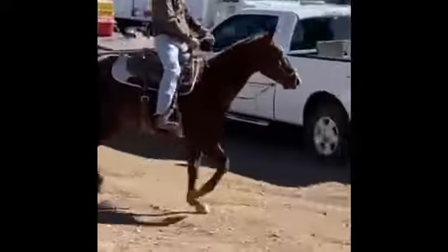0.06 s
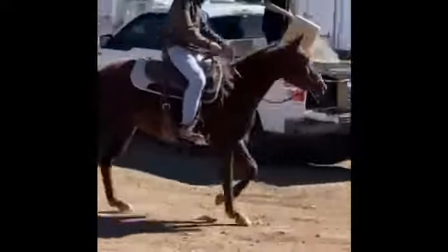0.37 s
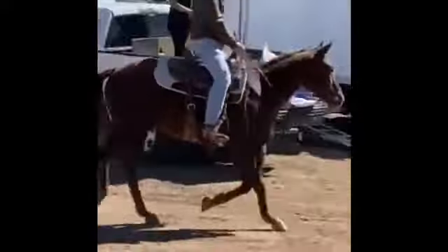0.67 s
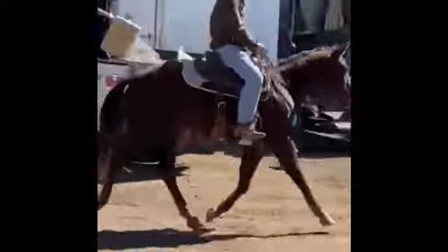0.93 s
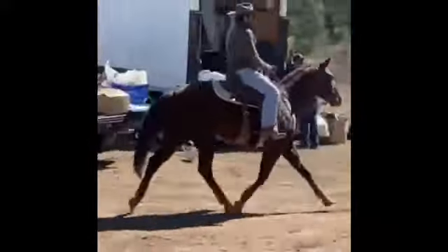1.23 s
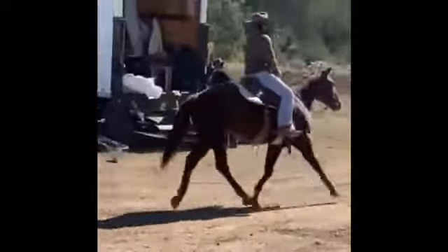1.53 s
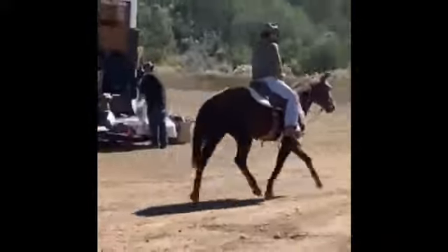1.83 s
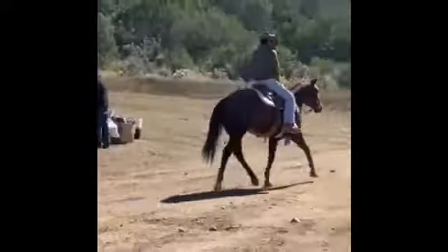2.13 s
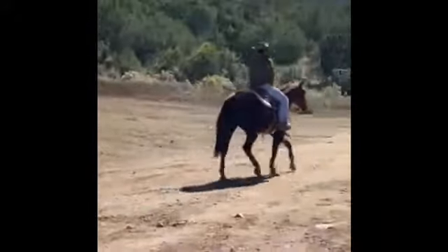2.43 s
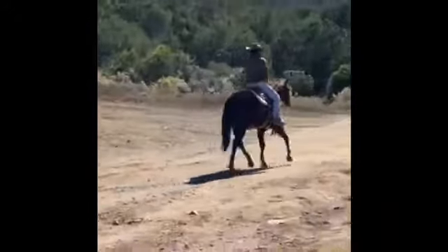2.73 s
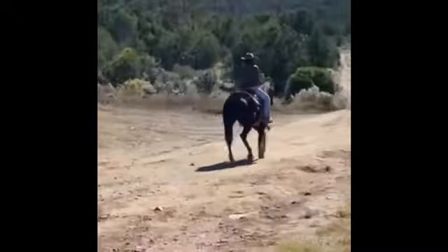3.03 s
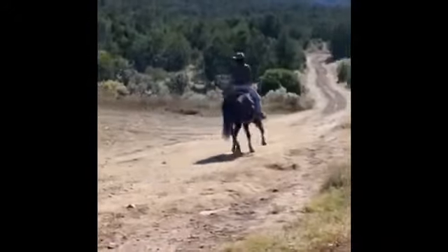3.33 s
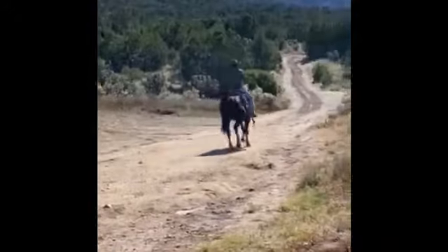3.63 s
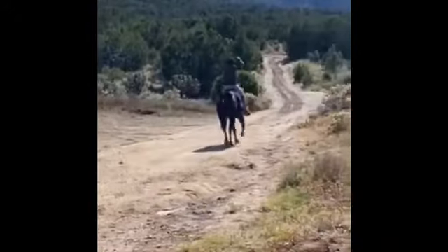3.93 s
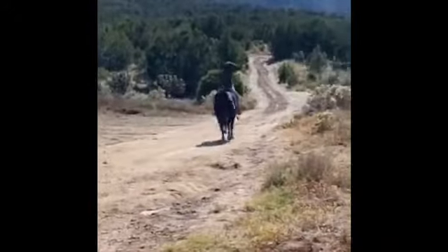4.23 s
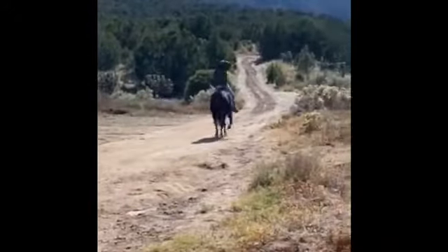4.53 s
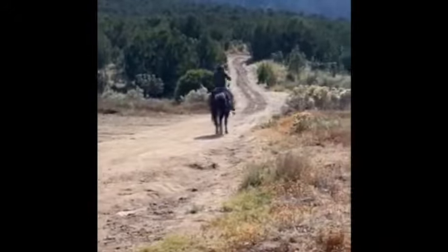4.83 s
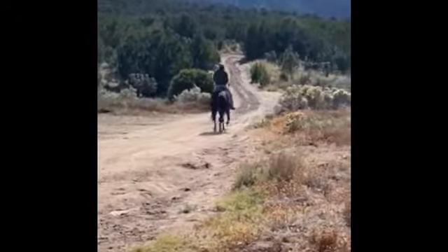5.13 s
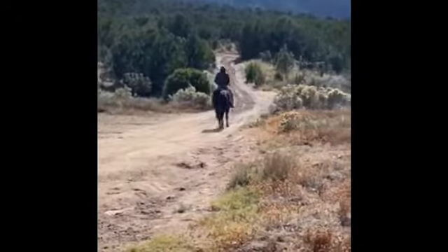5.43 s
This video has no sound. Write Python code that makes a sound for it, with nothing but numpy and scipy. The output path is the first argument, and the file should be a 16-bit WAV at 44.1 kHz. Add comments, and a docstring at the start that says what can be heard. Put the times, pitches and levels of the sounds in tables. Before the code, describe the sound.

A horse trots past on a gritty dirt road and moves off, with hollow hoof knocks and clinking tack over a low generator hum.

```python
"""A ridden horse trots past on a hard, gritty dirt road and moves off, about three footfalls a second.
Each hoof lands with a hollow knock inside a scuff of crushed earth and sand. Kicked pebbles click, the
metal tack clinks and rings, and the saddle creaks. Underneath, a nearby generator hums over a soft wash
of air. Near the end a little wind buffets the microphone, the hum wavers, and a fine treble hiss dips
and swells."""
import sys
import numpy as np
from scipy import signal
from scipy.fft import rfft, irfft
from scipy.io import wavfile

SR = 44100
rng = np.random.default_rng(int(sys.argv[2]) if len(sys.argv) > 2 else 0)


def file_out(sig):
    """Save sig as 16-bit WAV at sys.argv[1]."""
    # one column per channel
    cols = np.atleast_2d(sig).T
    # limit, then scale
    lim = np.clip(cols, -1, 1)
    pcm = np.round(lim * 32767).astype(np.int16)
    wavfile.write(sys.argv[1], SR, pcm)


N = 250929
TIME = np.arange(N) / SR

# hoof hits: (time [s], knock level [dB], hollow pitch [Hz], ring length [cycles], crack level [dB])
HOOF_HITS = [(.2825, -33, 805, 5, -44), (.3212, -28, 910, 12, -34), (.6445, -37, 627, 4.3, -37),
             (0.7505, -28, 517, 13, -70), (.7706, -34.5, 530, 8, -65), (0.9832, -44, 477, 2.2, -36),
             (0.995, -35, 1010, 4, -31), (1.0053, -30.5, 1220, 5.3, -24.5), (1.071, -39, 770, 7, -41),
             (1.2407, -42, 790, 4, -20.5), (1.2813, -34, 980, 7.9, -27), (1.2962, -33, 1000, 10, -40),
             (1.554, -39.5, 800, 5.2, -33), (1.619, -46, 960, 4, -45), (1.6375, -37, 910, 5.4, -27),
             (1.9045, -57, 1000, 4, -25.5), (1.9503, -33, 1120, 5.3, -27), (1.9535, -29, 1260, 6.5, -44),
             (2.171, -37, 1080, 2.3, -32), (2.2659, -29, 870, 4.9, -34), (2.5665, -32.5, 840, 4.9, -35),
             (2.9452, -25, 780, 3.5, -17.5), (3.204, -34.5, 560, 3.9, -43), (3.2105, -36.5, 755, 4.7, -47),
             (3.5485, -41, 1100, 5.2, -32), (3.659, -39, 507, 7, -65), (3.8533, -27.5, 714, 7.7, -30),
             (3.8755, -37.5, 596, 8, -54), (4.181, -35.5, 670, 9.2, -52), (4.4805, -31.5, 604, 6.4, -67),
             (5.129, -40.5, 520, 7.1, -67)]
# hoof wall on packed ground: (pitch [Hz], level [dB])
HOOF_WALL_MODES = [(1300, -8), (1750, -10.5), (2120, -4.5)]

def hoof_knocks():
    """The cupped sole gives a hollow note; a hard landing also cracks the hoof wall and snaps grit."""
    sole, wall = np.zeros(N), np.zeros(N)
    road_hz = 507
    road = mode(road_hz, t60=0.0089, contact=0.0013)
    for s, db, hz, cycles, crack_db in HOOF_HITS:
        hollow = mode(hz, t60=cycles / hz, contact=0.91 / hz)
        add(sole, s, from_db(db) * hollow / np.abs(hollow).max())
        firmness = np.clip(hz / road_hz - 1, 0, .5)  # a firm landing rings higher, drives the road harder
        add(sole, s, from_db(db - 0.5) * firmness * road)
        add(sole, s, from_db(db - 14.5) * burst(t60=0.065, low_hz=382, high_hz=1000))
        add(sole, s, from_db(crack_db - 22) * burst(t60=0.013, low_hz=2380, high_hz=5800))
        for k, (wall_hz, wall_db) in enumerate(HOOF_WALL_MODES):
            crack = mode(wall_hz * (1 + rng.normal(0, 0.076)), t60=0.0078, contact=0.00016)
            add(wall, s, (-1) ** k * from_db(crack_db + wall_db) * crack)
    earth_cushion = signal.butter(8, 2450, fs=SR, output="sos")
    return sole + signal.sosfilt(earth_cushion, wall)


# hoof scuffs, then in the last row a faint, soft swell of hiss near the end:
# (start [s], end [s], body level [dB], top level [dB])
NOISE_STROKES = [(0.271, 0.293, -48, -58), (0.315, 0.341, -47, -55.5), (0.638, 0.668, -48, -55),
                 (0.89, 0.905, -54, -61), (.986, 1.016, -47, -51.5), (1.069, 1.08, -50.5, -65),
                 (1.2, 1.23, -52.5, -65), (1.263, 1.269, -56, -56), (1.276, 1.302, -42.5, -56),
                 (1.606, 1.644, -45.5, -59), (1.917, 1.961, -44.5, -56), (2.251, 2.276, -44.5, -55),
                 (2.567, 2.582, -48, -64), (2.884, 2.901, -45, -63.5), (3.193, 3.214, -51, -67),
                 (3.523, 3.567, -56, -65), (3.852, 3.879, -56.5, -70), (4.18, 4.202, -61, -86),
                 (5.453, 5.543, -63, -70)]
# EQ of crushed earth, snapping clods and sprayed sand: (frequency [Hz], level [dB])
EARTH_EQ = [(150, -12), (400, 8), (800, 13), (1400, 5.5), (2200, 1), (3000, 2), (5000, -14), (9000, -29),
            (16000, -60)]
CLOD_EQ = [(500, -5), (1100, 4), (2200, 1), (3000, -6), (5500, -11.5), (7500, -24), (10000, -11),
           (16000, -35)]
SAND_EQ = [(1200, -20), (3000, 1), (5000, 4.5), (6500, -9), (9000, -3.5), (12000, -8.5), (14000, -19),
           (16000, -17)]

def scuffs_and_swell():
    """Sand sprays and earth crunches as a leg takes the weight; the last stroke is just a soft hiss."""
    attack_s, release_s, swell_db = 0.0042, 0.0054, 4
    body, top = np.zeros(N), np.zeros(N)
    for start, end, body_db, top_db in NOISE_STROKES:
        attack = np.minimum(TIME - start, 0) / attack_s
        release = np.maximum(TIME - end, 0) / release_s
        stroke = np.exp(attack - release) + 1e-18
        ramp = np.clip((TIME - start) / (end - start), 0, 1) - .5
        body += from_db(body_db + swell_db * ramp) * stroke
        top += from_db(top_db) * stroke
    thud = from_db(0.5) * noise([(60, -35), (130, -3.5), (260, 1), (500, -13), (1500, -62)])
    fine = from_db(-2) * crumbs(EARTH_EQ, per_s=4500, spread_db=2, cycles=12)
    coarse = from_db(-4) * crumbs(CLOD_EQ, per_s=380, spread_db=1.3, cycles=12)
    spray = grains(SAND_EQ, per_s=3500, spread_db=3)
    # a hoof catches and slips, so earth and sand give way together in clumps
    catch_db = 2.2 * flutter([(1, -10), (60, -10), (150, 0), (400, -6), (1200, -70)])
    return body * thud + rms_one(from_db(catch_db)) * (body * (fine + coarse) + top * spray)


# the horse's weight coming down: (time [s], level [dB], pitch [Hz])
WEIGHT_THUMPS = [(0.2888, -26, 190), (0.332, -36, 164), (0.9854, -26, 290), (1.299, -35, 220),
                 (2.2829, -29, 195), (2.905, -37, 175), (3.2043, -28, 270), (3.8538, -24, 235)]

def hoof_thumps():
    """The road gives under the loaded leg with a low, dead thump."""
    out = np.zeros(N)
    for s, db, hz in WEIGHT_THUMPS:
        add(out, s, from_db(db) * mode(hz, t60=0.027, contact=0.0018))
    return out


# the horse's pass, negative when moving off: (time [s], speed towards the microphone [m/s])
APPROACH_SPEED = [(0, 1.5), (0.9, 1.3), (1.5, -0.3), (2.3, -1.8), (2.6, -2.8), (3.4, -3.4), (5.69, -3.7)]

def distance_db(s):
    """Level relative to the start, falling as one over the horse's distance."""
    start_m, clock = 5.5, TIME[::100]
    speed = np.interp(clock, *np.transpose(APPROACH_SPEED))
    metres = start_m - np.cumsum(speed) * clock[1]
    return np.interp(s, clock, 20 * np.log10(start_m / metres))


def each_step(lag_s, scatter_s, count):
    """Trigger times scattered around a steady trot, count of them per step."""
    first_s, step_s = .345, .3205
    steps = np.repeat(np.arange(first_s, N / SR, step_s), count)
    return np.clip(steps + lag_s + scatter_s * rng.standard_normal(len(steps)), 0, TIME[-1])


# featured pebble clicks: (time [s], level [dB], pitch [Hz])
PEBBLE_CLICKS = [(0.048, -37, 4400), (0.159, -39, 4450), (.258, -41, 2100), (.3855, -42, 2150),
                 (0.452, -41, 4460), (0.634, -36, 4600), (0.7242, -36.5, 5000), (.7795, -35, 2750),
                 (0.838, -38, 4420), (0.875, -36, 4700), (0.888, -34, 3930), (0.9825, -28, 4630),
                 (1.0055, -30, 3300), (1.0685, -39, 1800), (1.1035, -40, 2000), (1.1337, -37, 4900),
                 (1.2415, -26, 3400), (1.258, -43, 5300), (1.331, -37, 1900), (1.4426, -38, 4400),
                 (1.5539, -40, 4220), (1.6067, -29, 5600), (1.6202, -30, 5070), (1.6425, -36, 1750),
                 (1.724, -30.5, 5270), (1.8495, -41, 1800), (1.8585, -39, 4400), (1.9042, -27.5, 5450),
                 (1.913, -29, 4600), (1.95, -32, 5460), (1.951, -24.5, 3200), (1.9865, -39, 3000),
                 (2.0625, -44, 4250), (2.0775, -38, 5100), (2.1085, -46, 5750), (2.1297, -33.5, 4200),
                 (2.138, -42, 5300), (2.155, -30, 4130), (2.172, -31, 3100), (2.1905, -42, 2050),
                 (2.245, -31, 5370), (2.254, -29, 4750), (2.4915, -43, 2150), (2.5575, -38, 2950),
                 (2.8165, -47, 3100), (2.9452, -39, 4370), (2.9685, -40, 3800), (3.027, -43, 2300),
                 (3.1224, -35, 4320), (3.1435, -44, 1950), (3.362, -39.5, 4430), (3.549, -32, 2740),
                 (3.5534, -38.5, 5440), (3.841, -42.5, 5200), (3.922, -43, 2000), (3.9612, -36, 5800)]
# ring of a pebble: (pitch multiple, level [dB])
PEBBLE_MODES = [(1, 1.5), (1.37, -9.5), (1.9, -11.5)]

def pebbles():
    """Stone on stone: a very short ping with a spit of grit; every push-off kicks two faint extras."""
    out, trim_db = np.zeros(N), -3.5
    times = each_step(lag_s=0.34, scatter_s=0.038, count=2)
    kicked = [(s, -49 + 1.5 * distance_db(s) + 6 * (size - .5), 2200 + 3200 * pitch)
              for s, (size, pitch) in zip(times, rng.random((len(times), 2)))]
    for s, db, hz in list(PEBBLE_CLICKS) + kicked:
        for multiple, mode_db in PEBBLE_MODES:
            ping = mode(hz * multiple, t60=0.0057, contact=0.00065, length=0.02)
            add(out, s, from_db(db + trim_db + mode_db) * ping)
        spit = burst(t60=0.026, low_hz=0.35 * hz, high_hz=5500 + 0.54 * hz)
        add(out, s, from_db(db + trim_db - 12) * spit)
    return out


JOLT_S = 0.099  # the rider's bounce shakes the tack this long after each step
# buckles and bit chain: (time [s], level [dB], base pitch [Hz], decay t60 [s], brightness [dB])
TACK_CLINKS = [(0.552, -57.5, 4950, 0.018, 20), (0.577, -56, 5000, 0.013, 18),
               (0.592, -55, 5030, 0.016, 17), (0.607, -64, 4900, 0.015, 15), (0.631, -57, 5000, 0.015, 17),
               (0.829, -35.5, 4600, 0.018, -4), (0.975, -53.5, 4940, 0.032, 18),
               (1.341, -54.5, 5750, 0.049, -17), (1.7241, -31, 4320, 0.017, 1.5),
               (2.011, -47.5, 4350, 0.06, -9.5), (2.19, -49, 4400, .015, -12),
               (2.367, -41, 4280, 0.012, -7), (2.414, -47.5, 4140, 0.016, -6),
               (2.637, -56, 4400, 0.015, -5), (2.648, -57, 5400, 0.014, -7), (2.675, -53, 5350, 0.016, -5),
               (3.059, -49.5, 4000, 0.015, -2), (3.078, -51, 4450, 0.021, -4),
               (3.242, -51, 5350, 0.021, -1), (3.426, -45.5, 4860, 0.019, -14),
               (3.457, -53, 5650, 0.029, -25), (3.47, -52.5, 4340, 0.021, 9.5),
               (3.591, -53, 4600, 0.016, 8), (3.657, -56, 5100, 0.018, -11),
               (3.737, -48.5, 4420, 0.02, -15), (3.79, -54, 4220, 0.021, -11),
               (3.9608, -32.5, 5350, 0.015, -24), (4.1304, -54, 4500, 0.035, -6),
               (4.132, -60.5, 5540, 0.047, 10), (4.256, -58, 5300, 0.029, 7),
               (4.503, -59.5, 5020, .08, -30), (4.6005, -34.5, 5450, 0.011, -17),
               (4.724, -46.5, 5550, 0.07, -28), (4.9272, -39, 5370, 0.015, -23),
               (4.953, -54, 5200, .018, -6), (5.179, -58, 5600, 0.035, -21),
               (5.2925, -49.5, 4580, 0.011, 3), (5.563, -57, 5200, 0.014, 9),
               (5.606, -51.5, 4000, 0.048, -2), (5.608, -58, 5250, 0.03, 17.5)]

def tack():
    """Links clink and rattle against their neighbours until leather damps them; steps add faint taps."""
    out = np.zeros(N)
    bounce_s, bounce_db = .003, -7
    times = each_step(lag_s=JOLT_S, scatter_s=0.049, count=3)
    taps = [(s, -57 + .65 * distance_db(s) + 7 * (size - .5), 4250 + 1400 * pitch ** 2, .012, -2)
            for s, (size, pitch) in zip(times, rng.random((len(times), 2)))]
    for s, db, hz, t60, bright_db in TACK_CLINKS + taps:
        away_db = distance_db(s)
        scrape = burst(t60=0.03, low_hz=3600, high_hz=10300)
        add(out, s, from_db(db + bright_db / 2 - 7.5) * scrape)
        add(out, s, from_db(db) * link(hz, bright_db, away_db, t60, spread=.005))
        bounce_lags = np.cumsum(bounce_s * (.5 + rng.random(3)))
        for k, lag in enumerate(bounce_lags, 1):
            neighbour = link(hz, bright_db, away_db, t60=.011, spread=.06)
            add(out, s + lag, from_db(db + k * bounce_db) * neighbour)
    chatter = flutter([(1, 0), (300, 0), (800, -15), (2500, -70)])
    return out * (0.86 + .35 * chatter)


# ring of a small metal link: (pitch multiple, level [dB])
LINK_PARTIALS = [(0.997, 0.5), (1.06, -8.5), (1.22, -18.5), (1.571, -16), (1.92, -1), (2.07, -10),
                 (2.3, -20.5), (3.61, -9)]

def link(hz, bright_db, away_db, t60, spread):
    """One link rings; its shape and the spot struck vary the tuning and strength of each partial."""
    multiple, mode_db = np.transpose(LINK_PARTIALS)[:, :, None]
    detune, strength = rng.standard_normal((2, len(LINK_PARTIALS), 1))
    far_db = 1.6 * (hz * multiple / 16000) ** 2 * away_db  # the top fades fastest as the horse leaves
    tilt_db = bright_db * np.minimum(multiple - 1, 1)
    gains = from_db(mode_db + far_db + tilt_db + 2 * strength)
    partials = mode(hz * multiple * (1 + spread * detune), t60, contact=0.0014, length=t60)
    return np.sum(gains * partials, axis=0)


# hard jolts to the bridle: (time [s], level [dB])
BRIDLE_JOLTS = [(0.042, -50), (0.129, -56.5), (0.425, -57.5), (1.44, -65), (1.54, -63), (1.724, -61.5),
                (1.82, -68), (2.02, -65), (2.525, -62.5), (2.61, -61.5), (3.36, -62.5), (3.96, -81.5),
                (4.255, -71), (4.6, -73)]

def bridle_ring():
    """A loose steel ring sings when jolted, shimmering as it rolls; every step stirs it a little."""
    pitch_hz, wobble_hz, attack_s, t60 = 9490, 14, .016, 0.41
    speed, = in_time(APPROACH_SPEED)
    doppler = 1 + speed / 343  # the pitch sinks as the horse passes
    hz = pitch_hz * doppler + wobble_hz * flutter([(1, 0), (40, 0), (100, -20), (400, -80)])
    stirs = [(s, -69 + distance_db(s)) for s in each_step(lag_s=JOLT_S, scatter_s=0.029, count=1)]
    envelope = np.zeros(N)
    for s, db in BRIDLE_JOLTS + stirs:
        add(envelope, s, from_db(db - 60 * TIME / t60) * np.minimum(TIME / attack_s, 1))
    shimmer = 1 + 0.49 * flutter([(1, -3), (40, 8.5), (120, -4), (400, -74.5)])
    return envelope * shimmer * np.sin(2 * np.pi * np.cumsum(hz) / SR)


# leather creaks under the rider: (time [s], level [dB], pitch [Hz], half length [s])
SADDLE_CREAKS = [(1.495, -53.5, 2160, 0.021), (1.788, -59, 2540, 0.012)]

def saddle():
    """Leather sticks and slips, each slip ringing one narrow resonance."""
    out = np.zeros((2, N))
    for s, db, hz, width in SADDLE_CREAKS:
        resonance = [(hz / 2, -40), (hz * 0.95, -11), (hz, 0), (hz * 0.97, -11), (hz * 2, -50)]
        out += from_db(db) * bump(s, width) * grains(resonance, per_s=600, spread_db=1.5)
    return out


# EQ of falling gravel: (frequency [Hz], level [dB])
GRAVEL_EQ = [(600, -17.5), (1200, 9), (2200, 8), (4500, -1.5), (6500, -14), (10000, -26), (13000, -21),
             (16000, -24.5)]

def gravel():
    """Small kicked stones fall back behind the horse."""
    stones = crumbs(GRAVEL_EQ, per_s=260, spread_db=2.5, cycles=10)
    return from_db(-67 + 0.71 * distance_db(TIME)) * stones


# exhaust tones, in quarter steps from four unequal cylinders: (firing rate multiple, level [dB])
EXHAUST_ORDERS = [(1, -29), (1.498, -56.5), (1.751, -55.5), (2, -43), (2.249, -50.5), (2.75, -50.5),
                  (3, -53), (3.5, -57.5), (4, -54.5), (4.75, -55), (6, -66.5)]
# brief dips and swells of the hum: (time [s], level change [dB], half length [s])
HUM_SWELLS = [(1.383, -2, 0.027), (2.813, -3, 0.018), (4.32, -1, 0.073), (5.057, -8.5, 0.013),
              (5.118, -4, 0.022), (5.185, 0, .02), (5.25, 1, 0.016), (5.33, -3.5, .025), (5.44, 1, 0.021)]
# EQ of the engine block's rumble: (frequency [Hz], level [dB])
RUMBLE_EQ = [(20, -40.5), (40, 4.5), (80, 5.5), (120, -0.5), (165, 2.5), (210, 1.5), (270, -0.1), (330, -2),
             (400, -10), (600, -49.5), (2000, -69.5)]
# fader ride of that rumble: (time [s], level [dB])
RUMBLE_FADER = [(0, -45), (2.6, -44), (3.2, -45), (5.69, -44)]

def generator():
    """Exhaust pulses at a governed speed over engine rumble; uneven combustion wavers the weak orders."""
    firing_hz, hum = 58.194, 0
    for multiple, db in EXHAUST_ORDERS:
        depth = {1: .035, 2: .15}.get(multiple, .35)
        waver = 1 + depth * flutter([(1, 0), (4, 0), (12, -25), (40, -90)])
        # whole orders line up into the exhaust pulse; those between fall anywhere in the cycle
        between = abs(multiple - round(multiple)) > .1
        turns = multiple * firing_hz * TIME + rng.random() * between
        hum -= from_db(db + 2.5) * waver * np.cos(2 * np.pi * turns)
    swell_db = sum(db * bump(s, width) for s, db, width in HUM_SWELLS)
    rumble_db, = in_time(RUMBLE_FADER)
    return from_db(swell_db) * hum + from_db(rumble_db) * noise(RUMBLE_EQ)


# gusts: (peak time [s], level [dB], half length [s])
WIND_GUSTS = [(0.03, -57, 0.17), (1.24, -45, 0.17), (4.835, -40.5, 0.14), (5.168, -39, 0.18),
              (5.252, -35, 0.022), (5.598, -42, 0.19)]
# bass-heavy EQ of the wind: (frequency [Hz], level [dB])
WIND_EQ = [(20, -18), (40, 14.5), (60, 6.5), (90, 18), (130, -22), (300, -37), (1500, -101.5)]

def wind():
    """Gusts buffet the microphone with a low, lumpy rumble."""
    gusts = sum(from_db(db) * bump(s, width) for s, db, width in WIND_GUSTS)
    lumps_db = 2 * flutter([(1, 0), (9, 0), (20, -25), (60, -90)])
    return gusts * from_db(lumps_db) * noise(WIND_EQ)


# fader ride of a fine treble hiss: (time [s], level [dB])
HISS_FADER = [(0.0, -66.5), (0.4, -75), (1.93, -75), (2.31, -78), (2.54, -71), (2.71, -85), (3.6, -76),
              (4.23, -101), (4.34, -103), (4.6, -71.5), (4.72, -77), (5.21, -84.5), (5.45, -73.5),
              (5.69, -88)]
# EQ of its grainy layer: (frequency [Hz], level [dB])
HISS_EQ = [(2000, 4), (4000, -6), (5500, 2), (7500, -10.5), (9800, 1.5), (12000, -13.5), (14000, -5.5),
           (16000, -30)]

def treble_hiss():
    """A fine hiss, one layer grainy and one smooth, which dips and swells near the end."""
    hiss_db, = in_time(HISS_FADER)
    grainy = grains(HISS_EQ, per_s=3000, spread_db=3.5)
    smooth = noise([(955, -15), (1910, -2), (3820, 0), (7640, -22), (15280, -40)])
    return from_db(hiss_db + 4) * grainy + from_db(-35.5 + 0.48 * hiss_db) * smooth


# EQ of the background bed: (frequency [Hz], level [dB])
WASH_EQ = [(200, -21.5), (350, 1.5), (500, 0.5), (750, -0.5), (1200, -7.5), (1700, -11.5), (2200, -15.5),
           (3000, -18.5), (5000, -27), (7000, -37.5), (9500, -38.5), (12000, -39), (16000, -44.5)]

def air_wash():
    """A soft bed of machine noise and open air whose level slightly follows the horse's pass."""
    return from_db(-54.5 + 0.2 * distance_db(TIME)) * noise(WASH_EQ)


# stereo image of diffuse sound: (frequency [Hz], left-right correlation [0-1])
STEREO_LIKENESS = [(100, .999), (300, .995), (700, .86), (2400, .92), (5000, .78), (12000, .76)]

def coloured(pair, eq):
    """Two unrelated white signals become a stereo pair with the given EQ; rms 1."""
    alike = np.clip(per_bin(STEREO_LIKENESS), 0, 1)
    mid, side = rfft(pair) * from_db(per_bin(eq))
    return rms_one(irfft(np.sqrt(1 + alike) * mid + np.sqrt(1 - alike) * side * [[1], [-1]], N))


def noise(eq):
    """Smooth stereo noise through an EQ of (frequency [Hz], level [dB]) points."""
    return coloured(rng.standard_normal((2, N)), eq)


def flutter(eq):
    """A mono random modulator."""
    return noise(eq)[0]


def grains(eq, per_s, spread_db):
    """Many tiny clicks of uneven size."""
    sizes = from_db(spread_db * np.minimum(rng.exponential(1, N), 4))
    return coloured(rng.standard_normal((2, N)) * sizes * (rng.random(N) < per_s / SR), eq)


def crumbs(eq, per_s, spread_db, cycles):
    """Bits of earth and stone break one by one, each ringing a few cycles at one of 13 pitches."""
    sizes = from_db(spread_db * np.minimum(rng.exponential(1, N), 3))
    breaks = rng.random(N) < per_s / SR
    clicks = sizes * breaks * np.sign(rng.random((2, N)) - .5)
    pitches = np.geomspace(550, 6200, 13)
    pitch_index = rng.integers(0, len(pitches), N)
    out = 0
    for k, hz in enumerate(pitches):
        decay = from_db(-60 * hz / (cycles * SR))
        resonator = [1, -2 * decay * np.cos(2 * np.pi * hz / SR), decay ** 2]
        ringing = signal.lfilter([1, 0, -1], resonator, clicks * (pitch_index == k) + 1e-18)
        out += np.sqrt(hz) * rms_one(ringing)
    return coloured(out, eq)


def mode(hz, t60, contact, length=.1):
    """A damped sine that builds up over the contact time; times in seconds."""
    t = TIME[:int(length * SR)]
    attack = 1 - np.exp(-(t / contact) ** 2)
    return np.sin(2 * np.pi * hz * t) * from_db(-60 * t / t60) * attack * (hz < SR / 2)


def burst(t60, low_hz, high_hz):
    """A dying 30 ms burst of band-passed noise."""
    t = TIME[:int(0.03 * SR)]
    band = signal.butter(2, [low_hz, high_hz], "band", fs=SR, output="sos")
    return rms_one(signal.sosfilt(band, rng.standard_normal(len(t)))) * from_db(-60 * t / t60)


def bump(s, width):
    """A bell-shaped envelope peaking at time s."""
    return np.exp(-((TIME - s) / width) ** 2)


def add(track, s, sound):
    """Mix a sound in at a time."""
    start = max(round(s * SR), 0)
    track[start:start + len(sound)] += sound[:N - start]


def from_db(db):
    """Decibels to gain."""
    return 10 ** (np.asarray(db) / 20)


def rms_one(x):
    """Scale to unit rms."""
    return x / np.sqrt(np.mean(x ** 2) + 1e-20)


def in_time(rows):
    """Columns of a curve at every sample."""
    s, *columns = np.transpose(rows)
    return [np.interp(TIME, s, c) for c in columns]


def per_bin(points):
    """A table over frequency, read at every spectral bin."""
    hz, value = np.transpose(points)
    return np.interp(np.log(np.arange(N // 2 + 1) * SR / N + 1), np.log(hz), value)


def scene():
    """The mix: knocks and scuffs sit a little left, everything else around the centre."""
    pan_left = from_db([[.85], [-.85]])
    hooves = (hoof_knocks() + scuffs_and_swell()) * pan_left + hoof_thumps()
    horse = hooves + pebbles() + tack() + bridle_ring() + saddle()
    return horse + generator() + air_wash() + treble_hiss() + gravel() + wind()


# phase between the two microphone ports: (frequency [Hz], left lead [rad])
PORT_LEAD = [(20, 0), (700, 0.05), (3500, 0.15), (5200, 0.4), (6200, 1.6), (7400, 3.14), (9800, 6.1),
             (11500, 6.9), (13600, 9.4), (15600, 12.4)]

def record(dry):
    """The two ports drift apart in phase through the treble; the top is cut."""
    cutoff_hz = 16200
    phase_turn = np.exp(.5j * per_bin(PORT_LEAD) * [[1], [-1]])
    ports = irfft(rfft(dry) * phase_turn, N)
    return signal.sosfilt(signal.ellip(10, .1, 80, cutoff_hz, fs=SR, output="sos"), ports)


dry = scene()
out = record(dry)
file_out(out)
```